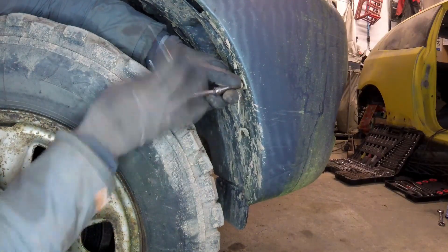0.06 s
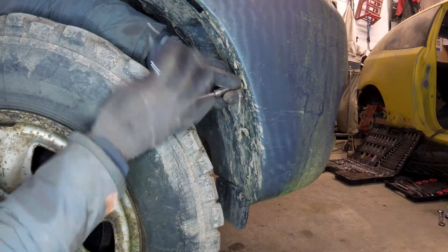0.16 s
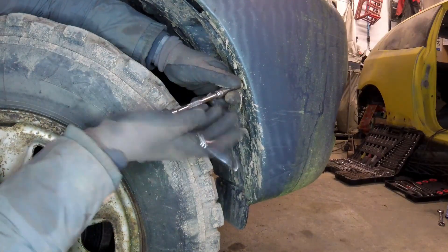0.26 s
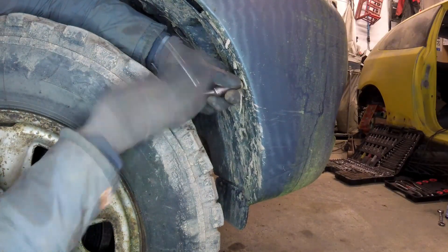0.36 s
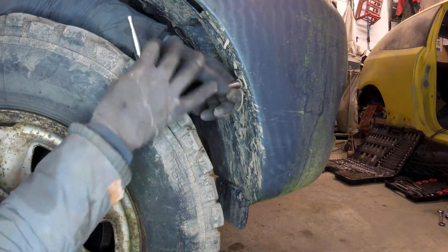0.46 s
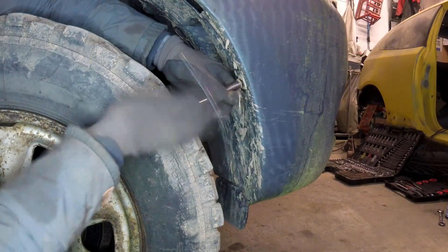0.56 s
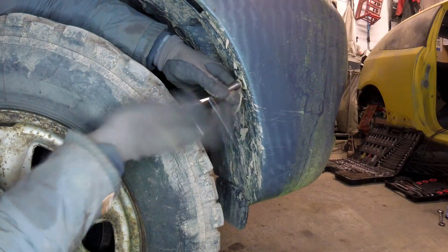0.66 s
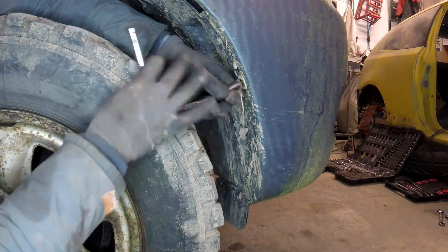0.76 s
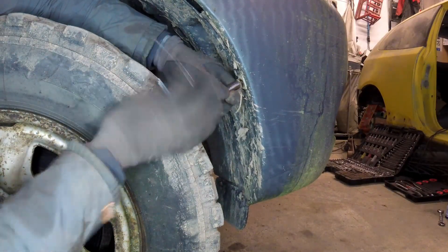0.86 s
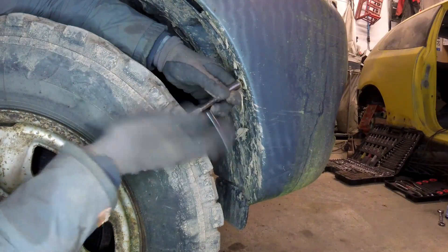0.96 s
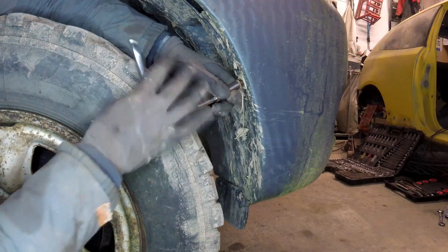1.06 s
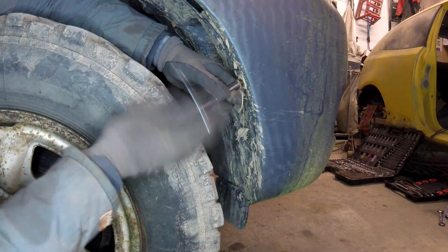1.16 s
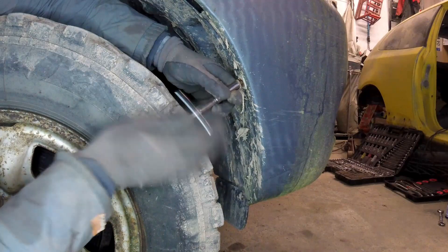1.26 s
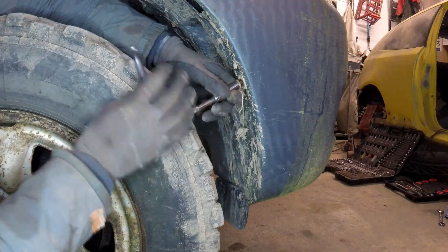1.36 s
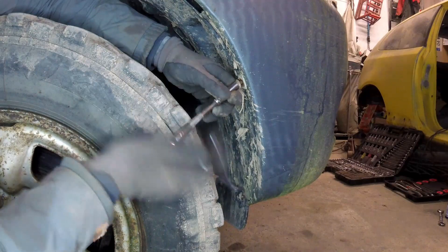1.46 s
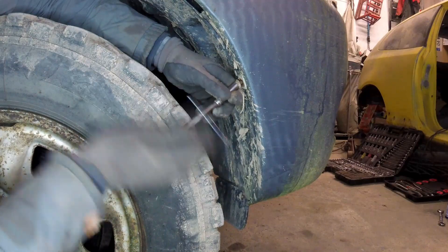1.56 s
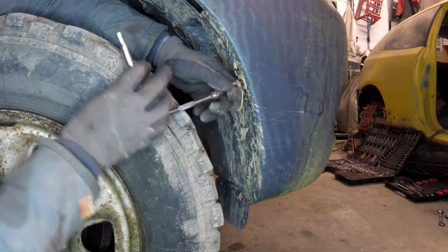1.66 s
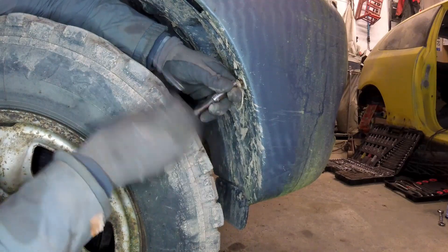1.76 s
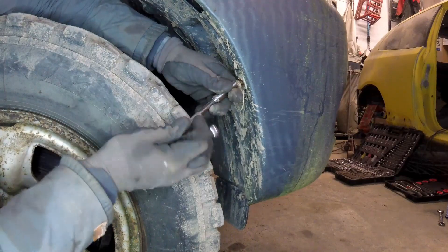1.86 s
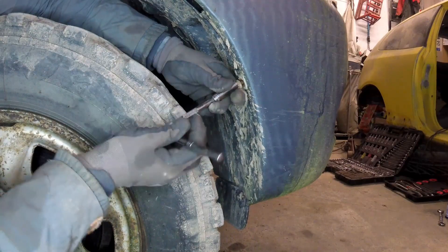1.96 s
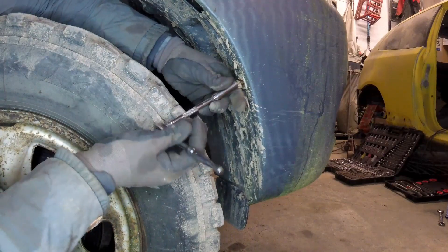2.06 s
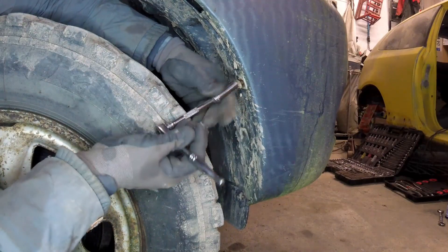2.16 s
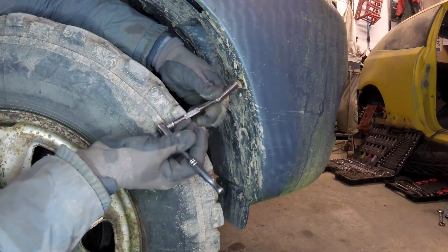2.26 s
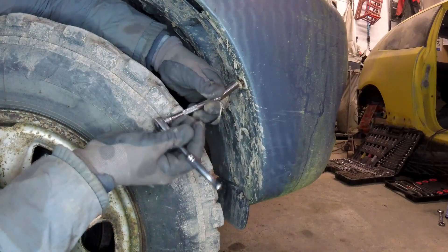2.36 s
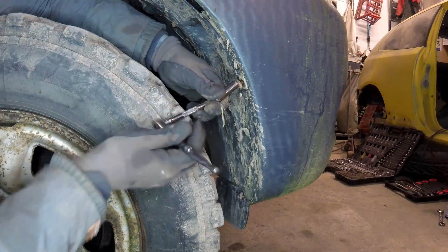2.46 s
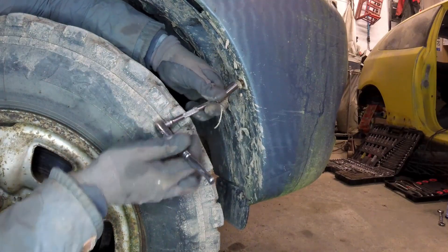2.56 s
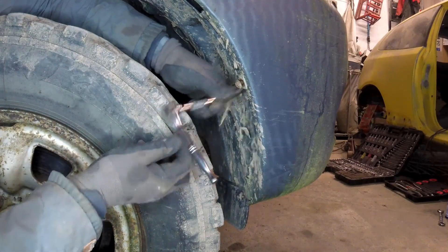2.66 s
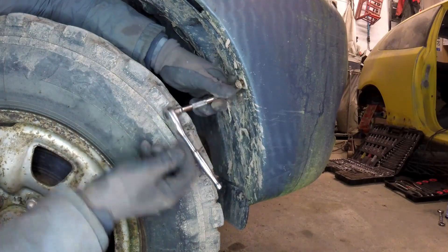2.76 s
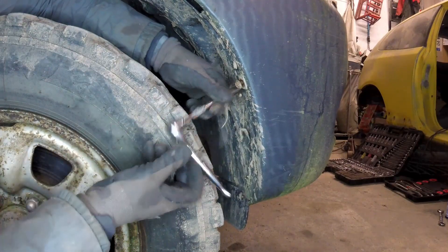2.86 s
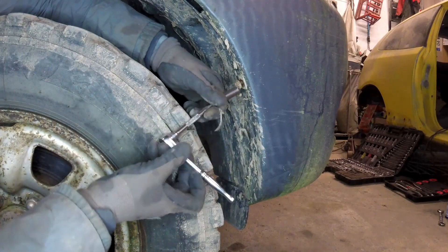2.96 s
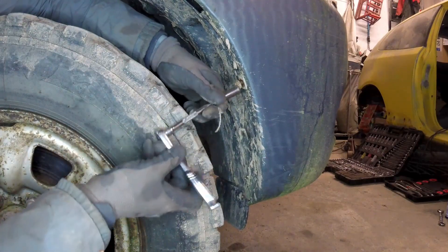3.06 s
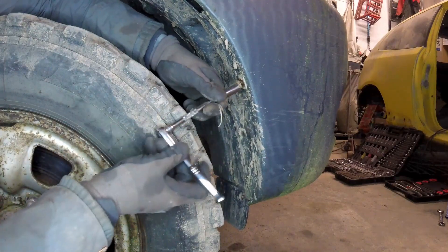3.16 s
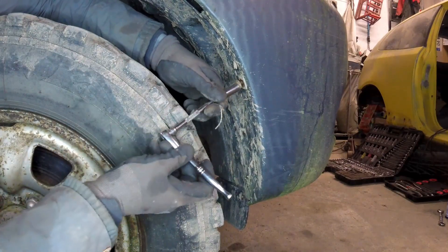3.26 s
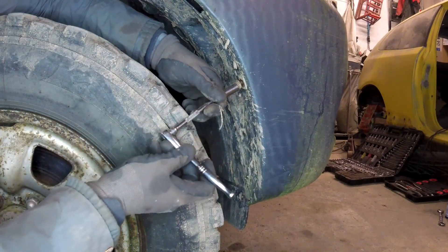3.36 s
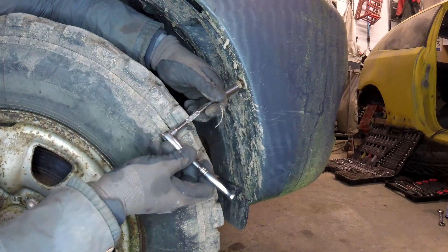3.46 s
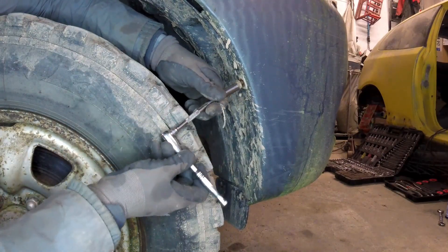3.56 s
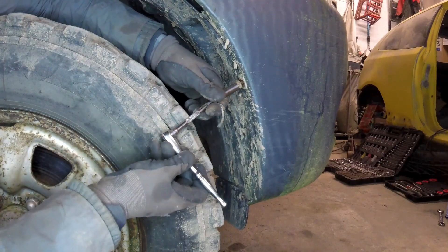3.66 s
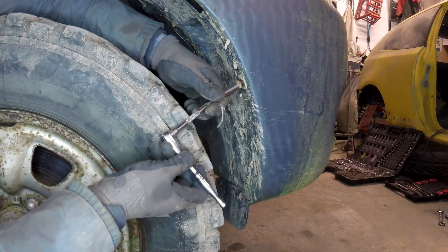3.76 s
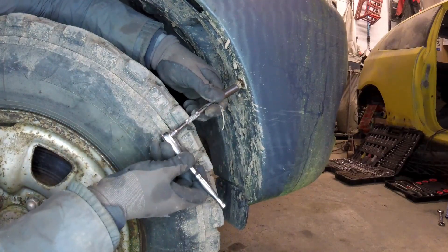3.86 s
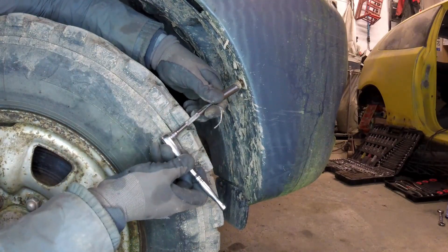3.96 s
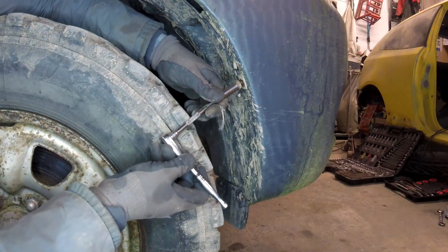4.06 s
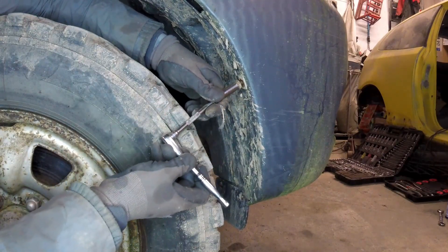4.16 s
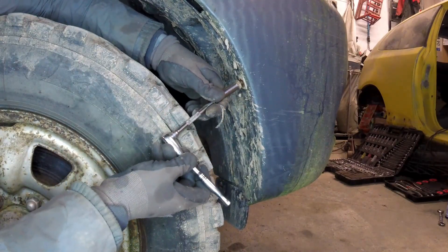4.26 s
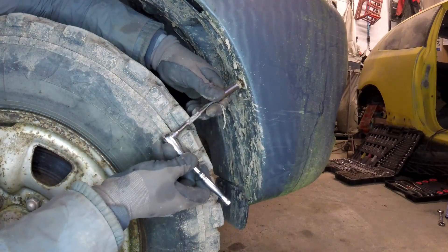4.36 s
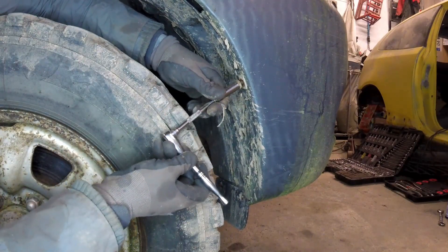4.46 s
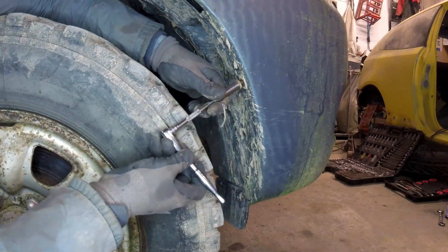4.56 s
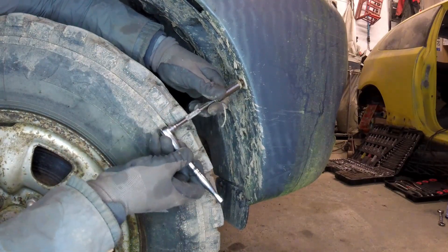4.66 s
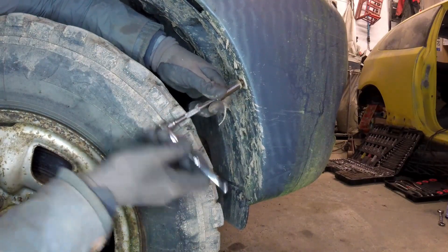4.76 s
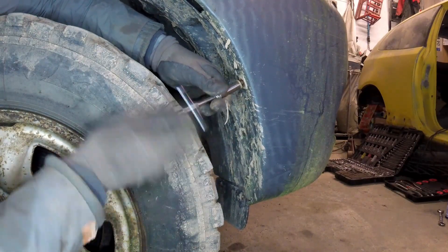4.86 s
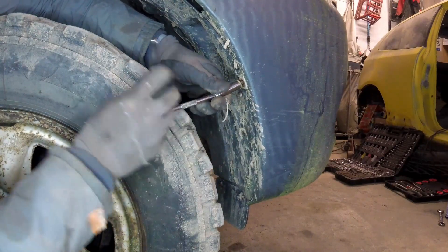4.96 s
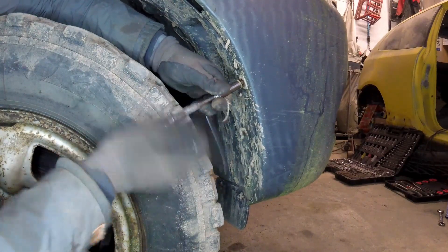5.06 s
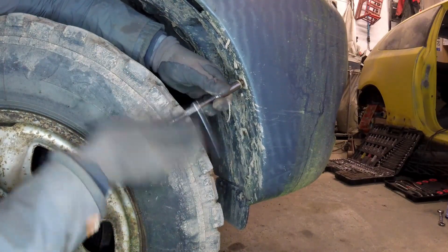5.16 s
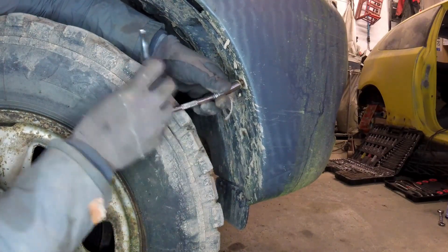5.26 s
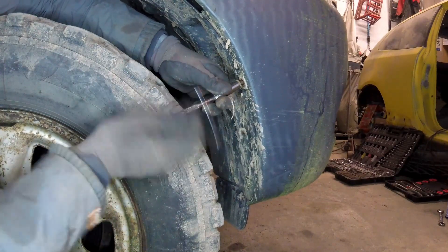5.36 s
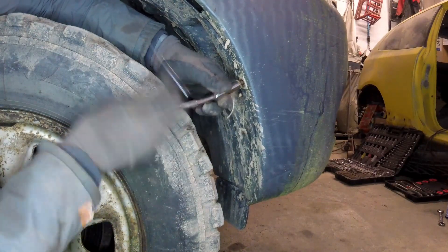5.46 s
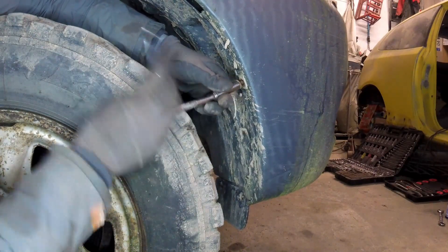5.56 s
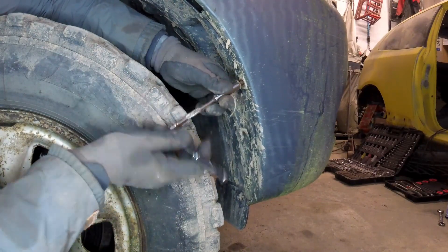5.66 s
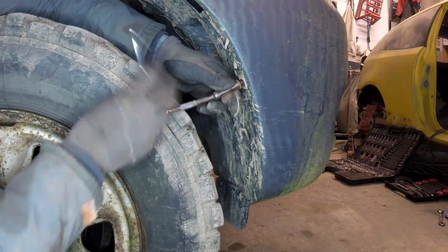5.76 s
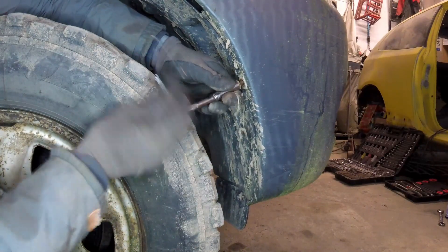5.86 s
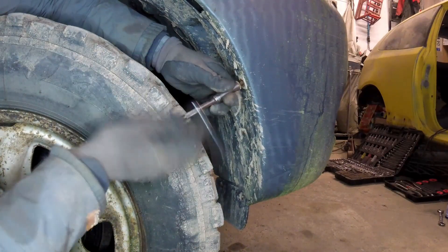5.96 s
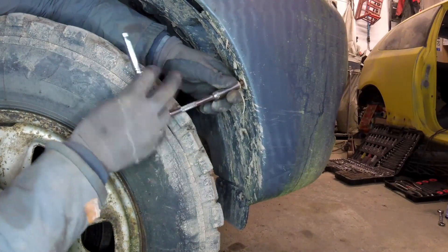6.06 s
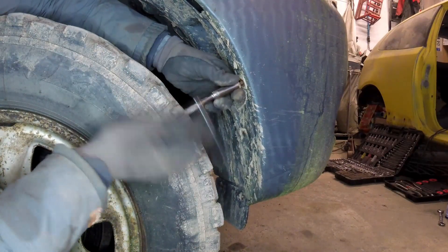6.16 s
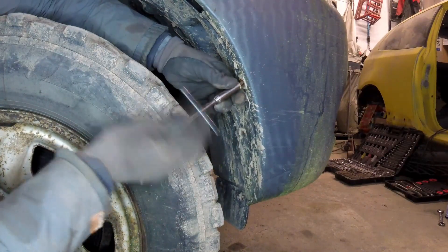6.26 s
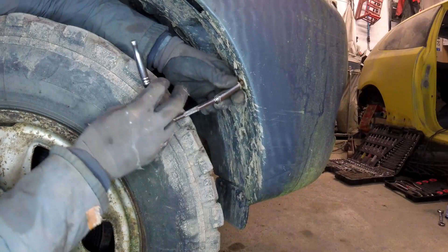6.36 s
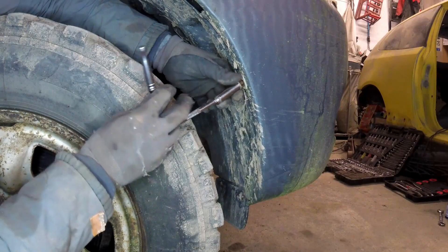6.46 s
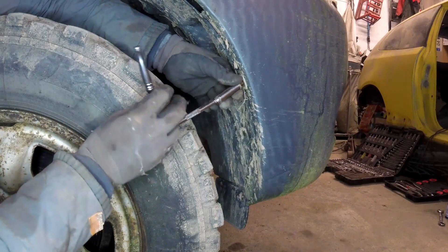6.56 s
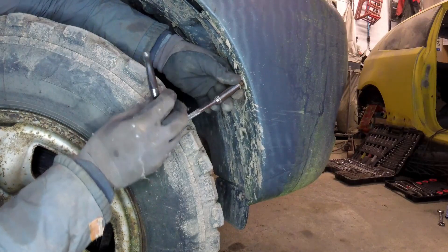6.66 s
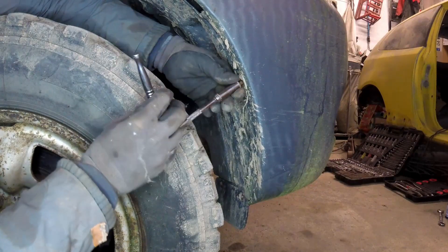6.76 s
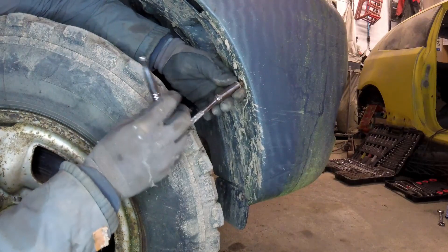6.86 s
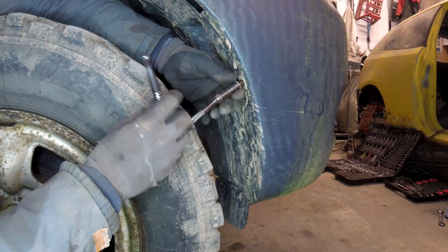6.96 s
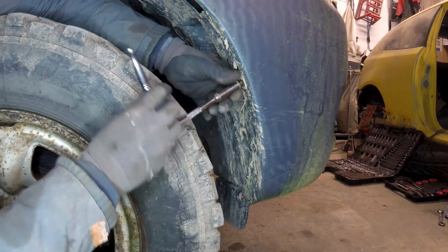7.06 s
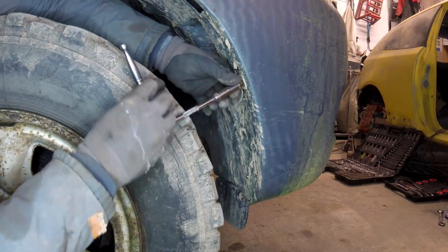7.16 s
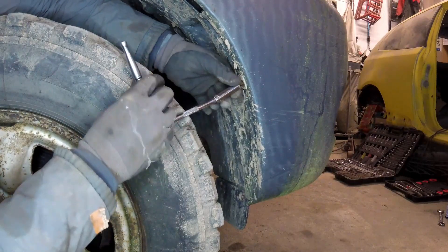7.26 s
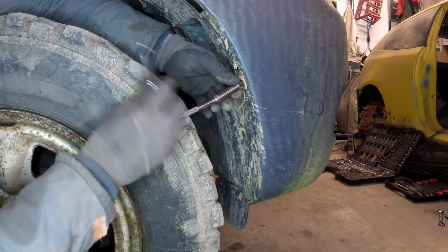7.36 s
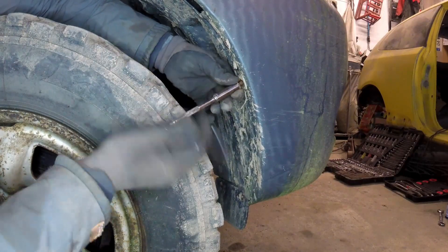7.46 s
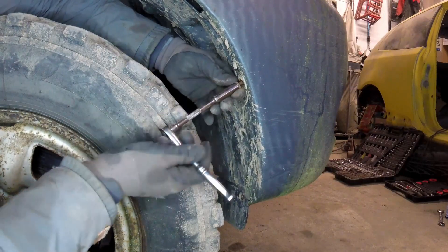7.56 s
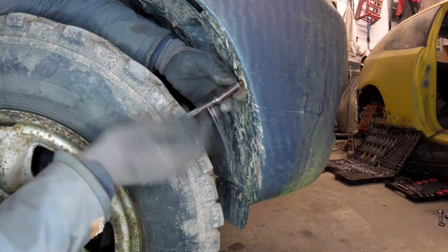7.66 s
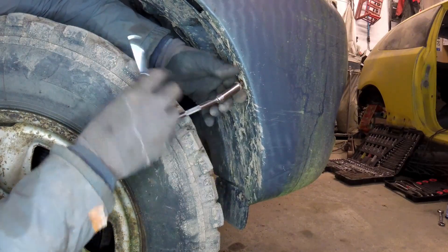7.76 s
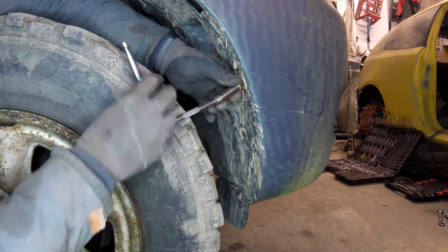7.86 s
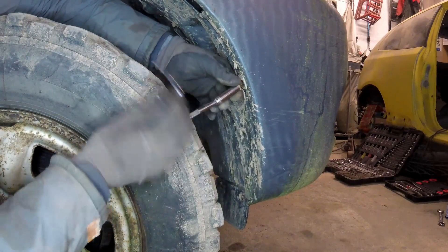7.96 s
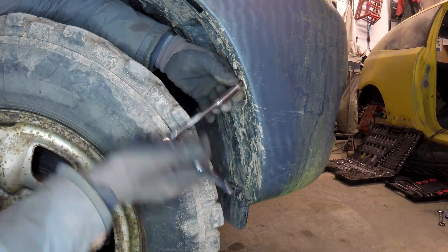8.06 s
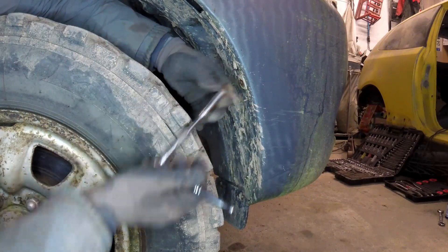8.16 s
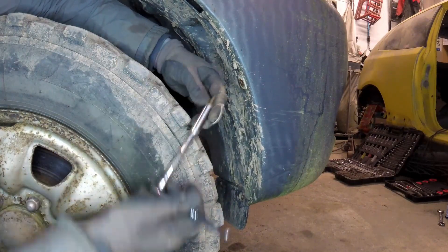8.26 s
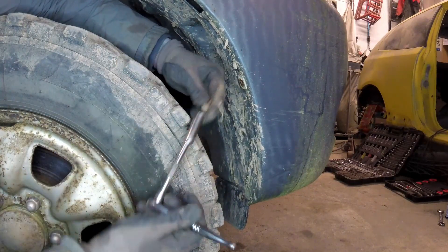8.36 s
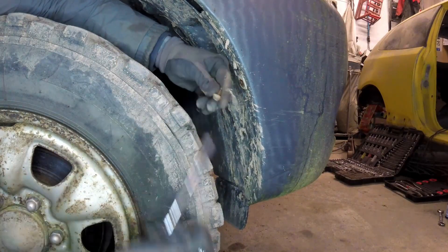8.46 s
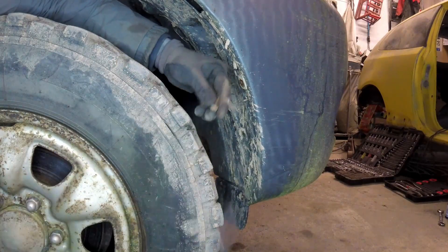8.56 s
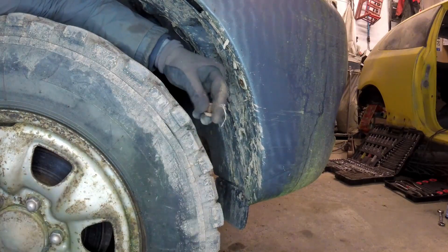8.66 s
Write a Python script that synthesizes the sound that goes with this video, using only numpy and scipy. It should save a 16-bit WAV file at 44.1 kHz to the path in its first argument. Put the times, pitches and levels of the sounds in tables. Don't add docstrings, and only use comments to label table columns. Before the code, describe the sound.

A close, dry phone pickup in a workshop: a small steel ratchet works a bolt in a hollow plastic wheel-arch panel. From 0.2 to 1.75 seconds six fast back-swings, each under a tenth of a second, blur bright clicks into a short zipping whirr, with soft hollow thumps between. Slower single clicks follow until about 2. At 2.6 comes a loud cluster of knocks with a creak and gritty scrape, then a few loose clicks near 2.8. From 3 to 4.8 it is mostly quiet, with isolated taps at 3.5, 4.4 and 4.7. Rapid zips resume at 5.0, loudest around 5.9, ending near 6.2; a halting, slower run comes at 6.6. Longer ratchet swings run at 7.3-7.55 and 7.9-8.1. Faint glove rustle, then a sharp double steel clank at 8.7. A faint low machine hum and air continue throughout.

```python
import sys
import numpy as np
from scipy import signal
from scipy.fft import rfft, irfft
from scipy.io import wavfile
from scipy.ndimage import uniform_filter1d

SR = 44100
rng = np.random.default_rng(int(sys.argv[2]) if len(sys.argv) > 2 else 0)


def voltage_ratio(level):
    return 10 ** (np.asarray(level, float) / 20)


def store_wav(level_fs):
    pcm = np.round(np.clip(np.atleast_2d(level_fs), -1, 1) * 32767)
    wavfile.write(sys.argv[1], SR, pcm.T.astype(np.int16))


N = 384993

# freq_hz, level_db, t60_s
HEAD_MODES = [(4990, -4.5, 0.0062), (5473, -8, 0.007), (6000, -6, 0.008), (6770, -7.5, 0.012),
              (7604, -5, 0.007), (8610, -11, .009), (9340, -13, 0.012), (10630, -8.5, 0.0074),
              (12320, -17.5, 0.007), (13600, -19, 0.007), (14700, -18, .006)]
# freq_hz, level_db, t60_s
BOLT_MODES = [(382, -4.5, 0.11), (491.6, 2, 0.031), (676, -1, 0.028), (1009, -6, 0.032), (1293, -1, 0.01),
              (1628, 0, 0.01), (2290, -5, 0.017), (2763, -4, 0.0083), (3180, -15.5, 0.036)]
# start_s, peak_db
FIRST_CRANKING = [(0.1805, -25), (0.185, -27), (0.1894, -28), (0.1933, -28), (0.2026, -29), (0.2051, -29),
                  (0.2094, -31), (0.2114, -28), (0.2158, -25), (0.2202, -28), (0.225, -26), (0.2278, -23),
                  (0.2309, -25), (0.2391, -27), (0.2449, -31), (0.4976, -29), (0.502, -28), (0.5074, -30),
                  (0.5166, -29), (0.5205, -33), (0.5237, -30), (0.5271, -33), (0.5304, -31), (0.5345, -30),
                  (0.5372, -29), (0.5413, -28), (0.5471, -29), (0.5498, -29), (0.5556, -28), (0.5572, -31),
                  (0.5613, -31), (0.5638, -30), (0.5674, -29), (0.574, -28), (0.5772, -26), (0.5815, -32),
                  (0.5885, -28),
                  (0.8157, -30), (0.8212, -30), (0.8265, -26), (0.8297, -29), (0.8335, -28), (0.8387, -26),
           (0.8414, -26), (0.8461, -30), (0.8482, -29), (0.8509, -26), (0.8536, -29), (0.8595, -26),
           (0.8617, -27), (0.8653, -29), (0.8705, -25), (0.8753, -27), (0.8787, -26), (0.8815, -27),
           (0.8852, -27), (0.8886, -32), (0.8944, -27), (0.8989, -28), (1.1052, -34), (1.1123, -30),
           (1.1184, -30), (1.1239, -31), (1.1284, -29), (1.1332, -30), (1.1361, -30), (1.1415, -25),
           (1.1452, -29), (1.1482, -26), (1.154, -29), (1.1605, -28), (1.1651, -31), (1.1685, -24),
           (1.1738, -27), (1.1769, -30), (1.1849, -35),
                  (1.3917, -29), (1.3973, -29), (1.402, -29), (1.4057, -30), (1.4099, -28), (1.4132, -30),
           (1.4168, -28), (1.4193, -29), (1.4225, -31), (1.4251, -29), (1.428, -29), (1.4308, -23),
           (1.4343, -29), (1.4409, -28), (1.4474, -24), (1.7131, -28), (1.7184, -27), (1.7234, -26),
           (1.7282, -29), (1.7329, -24), (1.7376, -33), (1.741, -30), (1.7463, -22), (1.7515, -28),
           (1.7567, -32), (1.7589, -31), (1.7653, -29)]
# start_s, peak_db
SECOND_CRANKING = [(4.9995, -38), (5.0079, -35), (5.0122, -27), (5.0187, -32), (5.0223, -30), (5.0277, -29),
                   (5.0305, -32), (5.0354, -27), (5.0385, -28), (5.0431, -27), (5.0464, -23), (5.051, -23),
                   (5.0544, -27), (5.0584, -25), (5.0624, -27), (5.0667, -25), (5.0717, -30), (5.0775, -29),
                   (5.0888, -28), (5.3195, -30), (5.3232, -26), (5.3282, -26), (5.3316, -25), (5.3354, -26),
                   (5.3379, -29), (5.3427, -28), (5.3456, -27), (5.35, -22), (5.3529, -25), (5.3575, -20),
                   (5.3609, -23), (5.3653, -23), (5.3693, -23), (5.3751, -24), (6.5931, -40), (6.5971, -31),
                   (6.6029, -29), (6.6132, -29), (6.6188, -26), (6.6298, -27), (6.6334, -27), (6.6443, -28),
                   (6.6475, -30), (6.6583, -29), (6.6622, -30), (6.6759, -29), (6.6805, -31),
                   (5.575, -29), (5.5808, -28), (5.5848, -26), (5.5904, -27), (5.5933, -24), (5.5977, -26),
           (5.6001, -25), (5.6041, -31), (5.6069, -26), (5.6105, -22), (5.6129, -23), (5.6161, -22),
           (5.6215, -23), (5.627, -19), (5.631, -27), (5.6404, -26), (5.6442, -25), (5.8426, -29),
           (5.8477, -29), (5.8518, -28), (5.8565, -25), (5.8599, -29), (5.8638, -29), (5.8665, -26),
           (5.8701, -22), (5.8731, -21), (5.8761, -21), (5.8789, -20), (5.8843, -19), (5.8886, -17),
           (5.894, -21), (5.8971, -16), (5.9012, -22), (5.9083, -23), (5.9147, -24), (6.1338, -25),
           (6.1368, -26), (6.141, -20), (6.1479, -22), (6.1549, -21), (6.1579, -21), (6.1651, -23),
           (6.17, -25), (6.1746, -31)]
# start_s, peak_db
LONG_SWINGS = [(7.2919, -29), (7.2978, -31), (7.3051, -29), (7.3108, -31), (7.3159, -28), (7.3221, -32),
               (7.3259, -34), (7.3286, -35), (7.3321, -31), (7.3347, -32), (7.3415, -27), (7.3439, -27),
               (7.3502, -29), (7.3527, -28), (7.3586, -28), (7.3609, -26), (7.3663, -27), (7.3689, -28),
               (7.3744, -24), (7.377, -27), (7.3826, -23), (7.386, -26), (7.3917, -25), (7.3949, -28),
               (7.3995, -24), (7.4069, -28), (7.4098, -28), (7.4139, -24), (7.4173, -26), (7.4214, -23),
               (7.4246, -26), (7.4291, -27), (7.4322, -25), (7.4389, -23), (7.4436, -26), (7.4464, -24),
               (7.4504, -24), (7.4529, -23), (7.4571, -25), (7.4596, -24), (7.4634, -25), (7.4659, -26),
               (7.4699, -25), (7.4734, -23), (7.4773, -25), (7.4805, -23), (7.4844, -22), (7.488, -25),
               (7.4923, -23), (7.4954, -23), (7.4976, -26), (7.5002, -23), (7.5026, -26), (7.5076, -25),
               (7.5102, -25), (7.5158, -22), (7.5202, -22), (7.5264, -27), (7.5316, -21),
               (7.8903, -29), (7.8971, -29), (7.9062, -29), (7.911, -33), (7.9167, -26), (7.92, -26),
                (7.9252, -23), (7.9286, -27), (7.9333, -28), (7.9369, -22), (7.9403, -29), (7.9437, -28),
                (7.9471, -24), (7.9498, -27), (7.9565, -24), (7.9595, -26), (7.9621, -27), (7.9654, -25),
                (7.9679, -24), (7.9709, -23), (7.9736, -24), (7.9787, -26), (7.9817, -26), (7.9841, -27),
                (7.989, -25), (7.9932, -22), (8.0021, -26), (8.0051, -26), (8.0074, -25), (8.0117, -24),
                (8.0139, -25), (8.0177, -25), (8.0216, -21), (8.0256, -20), (8.0282, -23), (8.0327, -30),
                (8.0374, -22), (8.0423, -24), (8.0482, -28), (8.0522, -24), (8.0621, -29), (8.0687, -26),
                (8.0765, -26)]
# start_s, peak_db
STRAGGLER_TEETH = [(0.2514, -27), (0.2783, -32), (0.5944, -30), (0.6913, -39), (0.9218, -36), (0.9246, -33),
                   (1.2151, -37), (1.4564, -22), (1.4644, -28), (1.474, -26), (1.503, -33), (1.5084, -33),
                   (1.6926, -29), (3.5648, -39), (4.7292, -39), (5.1172, -36), (5.4031, -33), (5.6594, -28),
                   (5.6704, -28), (5.9304, -35), (7.2809, -29), (7.5404, -27), (7.4026, -28), (7.4365, -25),
                   (5.8816, -23), (6.1435, -24), (7.5511, -23), (8.089, -23), (8.1004, -24), (8.1214, -28)]
# start_s, peak_db
SLOW_TURN_TEETH = [(1.7749, -27), (1.7874, -31), (1.7998, -29), (1.8148, -29), (1.8477, -27), (1.8751, -26),
                   (1.8854, -31), (1.9116, -32), (1.957, -32), (2.0293, -29), (2.809, -28), (2.8245, -33),
                   (2.8474, -34), (2.8684, -31), (2.8978, -31), (6.7261, -29), (6.7386, -29), (6.8394, -29),
                   (6.8698, -30)]
# start_s, peak_db
PAWL_TICKS = [(0.0273, -34), (0.0593, -34), (0.0807, -37), (0.0912, -36), (0.0974, -36), (0.1276, -34),
              (0.1324, -34), (3.0629, -44), (3.4955, -30), (3.5024, -37), (4.368, -39), (7.238, -45)]
# start_s, end_s, whirr_db, grind_db, grind_tilt_db_per_octave
BACK_SWINGS = [(0.189, .245, -26, -39, 0.8), (0.51, 0.588, -28, -39.5, 1), (0.824, 0.901, -24, -36.5, 2.5),
               (1.117, 1.185, -28, -40.5, -0.3), (1.395, 1.441, -27.5, -41.5, -2),
               (1.72, 1.754, -29.5, -53.5, 5), (5.007, 5.094, -35, -43.5, 1.5),
               (5.314, 5.364, -27.5, -39.5, 0), (5.577, 5.652, -28.5, -43.5, 1),
               (5.848, 5.914, -24, -42, 1), (6.134, 6.17, -26, -48, 3), (6.601, 6.693, -50, -59.5, 5),
               (7.3, 7.52, -34, -51, 2.5), (7.925, 8.005, -27, -48, 1)]
# start_s, peak_db
CLANK_HITS = [
    (8.7048, -12.5),
    (8.7075, -11),
    (8.7105, -22),
]
# freq_hz, level_db, t60_s
STEEL_MODES = [(2300, -20, 0.008), (3300, -20, 0.008), (5420, 2, 0.0059), (6130, -10, 0.06),
               (7230, -7.5, .014), (8430, -9, 0.012), (9530, -9.5, 0.013), (10900, -15.5, .01),
               (13300, -18, .01)]
# start_s, peak_db
PALM_THUMPS = [(0.025, -17.5), (0.252, -23), (0.363, -27), (0.506, -25.5), (0.599, -22), (0.626, -20.5),
               (0.692, -28), (0.724, -22), (0.928, -24.5), (1.002, -26), (1.203, -29), (1.354, -33),
               (1.456, -22.5), (1.548, -22), (2.728, -18), (2.78, -27), (5.084, -24.5), (5.128, -24),
               (5.225, -26.5), (5.305, -32.5), (5.398, -23), (5.623, -29.5), (5.681, -27), (5.946, -21),
               (6.095, -29), (6.382, -36), (7.294, -34.5), (7.805, -39)]
# start_s, peak_db
TOOL_KNOCKS = [(1.699, -20), (2.03, -26.5), (2.186, -24.5), (2.233, -28.5), (2.441, -33.5), (2.611, -14),
               (2.636, -14), (2.643, -12), (2.871, -22.5), (3.27, -27), (3.306, -27.5), (3.497, -16),
               (3.735, -36.5), (4.369, -25.5), (4.38, -22.5), (4.757, -28), (8.706, -27.5)]
# freq_hz, level_db, t60_s
PANEL_MODES = [(147, -22, 0.05), (165, 1.5, 0.2), (189, -4, 0.15), (205.7, -10.5, .12), (252.7, -7, 0.23),
               (330, -9, 0.1), (375, -10, 0.12), (475.3, -13, 0.11), (565, -17, 0.045),
               (668.3, -18.5, 0.068)]
# start_s, peak_db, t60_s, crack_over_rattle_db
HARD_TAPS = [(0.022, -35.5, .06, 7), (0.127, -32.5, .09, 7), (.358, -42, .035, 3), (0.691, -42, .06, 7),
             (1.509, -39, .06, 4), (1.696, -39, .18, 7), (2.031, -43, .068, 7), (2.559, -31, .1, 9),
             (2.594, -34, .2, -3), (2.626, -29, .12, 3), (2.641, -29, .18, -3), (2.65, -31, .12, 3),
             (2.868, -33, .075, 7), (2.903, -35.5, .066, 7), (3.169, -42.5, .065, 7), (3.269, -48, .05, 3),
             (3.288, -42, .05, 3), (3.303, -40, .06, 3), (3.349, -47, .07, 3), (3.497, -28.5, .1, 7),
             (4.367, -31, .12, 3), (4.729, -29.5, .18, 7), (4.999, -41, .1, 7), (5.179, -47, .03, 7),
             (8.705, -42, .055, 7)]
# freq_hz, gain_db
TAP_SPECTRUM = [(300, -2), (1000, 7), (2000, -1), (3500, -3.5), (5400, -3.5), (9000, -30.5), (15000, -46)]
# time_s, level_db
HAND_EFFORT = [(0, -42), (.8, -44), (1.3, -50), (1.9, -47), (2.3, -50), (3.1, -55), (3.7, -55), (4.2, -60),
               (4.62, -56), (4.85, -47), (5.5, -45), (6.07, -48), (6.5, -50), (7.24, -57), (7.76, -51),
               (8.14, -54), (8.6, -57)]
# peak_s, boom_db, creak_db, rise_s, fall_s (per 20 dB)
PANEL_PUSHES = [(.035, -27, -42, .05, .12), (.38, -31.5, -46, .4, .12), (.64, -32, -40, .2, .4),
                (.85, -44, -41, .15, .4), (1.01, -34.5, -45, .3, .15), (1.23, -33, -43, .4, .1),
                (1.45, -32, -40, .14, .4), (1.55, -35, -32, .2, .11), (1.71, -29, -40, .045, .13),
                (2.045, -31, -48, .025, .08), (2.19, -40, -46, .05, .25), (2.645, -23, -18, .1, .12),
                (2.88, -23.5, -32.5, .05, .14), (3.33, -33, -35, .06, .12), (3.51, -26, -35, .014, .1),
                (4.38, -31, -29, .035, .1), (4.76, -33.5, -54, .07, .15), (8.73, -31, -37.5, .04, .1),
                (5.42, -36, -40, .3, .12), (5.67, -36, -43, .35, .3), (5.96, -34, -41, .3, .15),
                (6.11, -37.5, -51, .07, .5), (7.47, -42, -48.5, .3, .5), (8.06, -39.5, -48, .45, .12)]
# peak_s, scrape_db, rustle_db, rise_s, fall_s (per 20 dB)
GLOVE_SLIPS = [
    (0, -56.5, -61, .1, 1.5),
    (1.52, -54.5, -58, .3, .25),
    (2.44, -60.5, -58, .12, .12),
    (2.64, -41.5, -50, .12, .12),
    (2.9, -58, -64, .3, .2),
    (3.31, -57, -69, .15, .2),
    (8.22, -63, -60, .15, .5),
    (8.73, -61, -58, .6, .1),
]
# freq_hz, gain_db
SCRAPE_SPECTRUM = [(600, -1), (900, 2.5), (1800, -3), (3200, -6.5), (5000, -20)]
# freq_hz, gain_db
RUSTLE_SPECTRUM = [(3000, -26), (4500, 15), (9000, 10), (15000, -21.5)]
# freq_hz, gain_db
SHOP_SPECTRUM = [(100, 7.5), (250, 3.5), (600, -8), (1500, -12), (3000, -20.5), (6000, -19.5),
                 (10000, -15.5), (16000, -19)]
# freq_hz, gain_db
MIC_RESPONSE = [(2500, 3.5), (3400, 0), (4000, -5.5), (4600, -6.5), (5400, 1.5), (6500, -5), (10000, -3),
                (11500, -10), (13500, -11.5), (14800, -20), (15500, -24), (16000, -40)]
# freq_hz, gain_db
RUMBLE_SPECTRUM = [(30, -1), (60, 5), (120, 5), (300, -37)]

BOUNCE_S = .003
TREBLE_DB, TREBLE_DB_PER_DB, TREBLE_PIVOT_DB = -4, -.4, -26
PALM_UPPER_DB, TOOL_UPPER_DB, GRIP_T60_S = -4.5, 4, .1
DULL_HZ, HARD_TAP_DB = 3300, -32
CREAK_DB, SCRAPE_DB, RUSTLE_DB = -8, -18, -20.5
ARCH_T60_S, ARCH_DB, ROOM_T60_S, ROOM_DB = .023, -9, .55, -19.5
SHOP_DB, HUM_DB, RUMBLE_DB, LOW_CUT_HZ = -56.5, -60, -75.5, 133


def ratchet():
    s, db = teeth()
    count = len(s)
    low = strikes(HEAD_MODES[:5], count, size=500, scatter_db=3., detune=.04, rise_s=.0003)
    high = strikes(HEAD_MODES[5:], count, size=500, scatter_db=3., detune=.04, rise_s=.0003)
    treble_db = TREBLE_DB + TREBLE_DB_PER_DB * np.clip(db - TREBLE_PIVOT_DB, -7, 9)
    snap = low + voltage_ratio(treble_db)[:, None] * high
    knock = voltage_ratio(-21.5) * strikes(BOLT_MODES[3:], count, size=500, scatter_db=3.0, detune=0.087, rise_s=0.00024)
    chance = rng.standard_normal((count, 2))
    bounce = strikes(HEAD_MODES, count, size=300, scatter_db=2.0, detune=0.043, rise_s=.0005)
    bounce_s = s + BOUNCE_S * (1 + .2 * chance[:, 0])
    bounce_db = db - 15.5 + 0.89 * chance[:, 1]
    out = place(s + .0001, voltage_ratio(db + 1.1)[:, None] * (snap + knock))
    out = out + place(bounce_s, voltage_ratio(bounce_db)[:, None] * bounce)
    s, db = np.transpose(PAWL_TICKS)
    tick = strikes(HEAD_MODES[:5], len(s), size=500, scatter_db=3.5, detune=.04, rise_s=.0004)
    return out + place(s + .0003, voltage_ratio(db + 1.5)[:, None] * tick)


def teeth():
    cranks = FIRST_CRANKING + SECOND_CRANKING
    return np.transpose(cranks + LONG_SWINGS + STRAGGLER_TEETH + SLOW_TURN_TEETH)


def whirr():
    t, out, drag, tilt = np.arange(N) / SR, 0, 0, 0
    for start, end, whirr_db, grind_db, tilt_db in BACK_SWINGS:
        chance = rng.standard_normal((110, 2))
        s = start + np.cumsum(0.0019 * np.exp(0.25 * chance[:, 0]))
        arch_db = -14. * ((s - start) / (end - start) - .6) ** 2 - 8.5
        gain = voltage_ratio(whirr_db + arch_db + 3. * chance[:, 1])
        ring = strikes(HEAD_MODES, 110, size=300, scatter_db=5., detune=0.0486, rise_s=0.00055)
        out = out + place(s[s < end], (gain[:, None] * ring)[s < end])
        corners_s = [start - .013, start - .009, end - .01, end + 0.02]
        drag = drag + voltage_ratio(grind_db) * np.interp(t, corners_s, [0, .85, 1, 0])
        tilt = tilt + tilt_db * (np.abs(t - (start + end) / 2) < end - start)
    s, db = teeth()
    jolt = place(s, voltage_ratio(db / 2)[:, None] * np.exp(-np.arange(400) / SR / .0015))
    grit = rng.standard_normal(N) * (jolt + .03)
    grind = 0
    for hz, db, t60 in BOLT_MODES:
        turn = voltage_ratio(2.2 * walk(16) + tilt * np.log2(hz / 1000))
        grind = grind + turn * level(resonate(grit, hz, t60), db - 18.)
    return out + drag * grind


def clank():
    s, db = np.transpose(CLANK_HITS)
    ring = strikes(STEEL_MODES, len(s), size=2000, scatter_db=2.5, detune=0.008, rise_s=0.00014)
    return place(s, voltage_ratio(db)[:, None] * ring)


def thumps():
    out, t = 0, np.arange(5000) / SR
    grip = .8 + np.exp(-np.log(1000) * t / GRIP_T60_S)
    for table, upper_db in ((PALM_THUMPS, PALM_UPPER_DB), (TOOL_KNOCKS, TOOL_UPPER_DB)):
        s, db = np.transpose(table)
        held = [(hz, gain_db + upper_db * (hz > 300), 0.9 * t60) for hz, gain_db, t60 in PANEL_MODES]
        ring = grip * strikes(held, len(s), size=5000, scatter_db=3.5, detune=0.034, rise_s=.002)
        out = out + place(s + .0005, voltage_ratio(db - 5.5)[:, None] * ring)
    return out


def taps():
    s, db, t60, crack_db = np.transpose(HARD_TAPS)
    t = np.arange(6000) / SR
    rattle = np.exp(-np.log(1000) * t / np.clip(t60, .005, .3)[:, None])
    fall = rattle * (1 + voltage_ratio(crack_db)[:, None] * np.exp(-t / 0.0019))
    noise = rng.standard_normal((len(s), 6000))
    crack = colour(noise * fall * np.minimum(t / .0006, 1), TAP_SPECTRUM)
    dull = signal.sosfilt(signal.butter(4, DULL_HZ, fs=SR, output="sos"), crack)
    crack = dull + voltage_ratio(np.minimum(db - HARD_TAP_DB, 0))[:, None] * (crack - dull)
    return place(s, voltage_ratio(db + 4.0)[:, None] * crack / np.abs(crack).max(axis=1, keepdims=True))


def shake():
    boom, creak = swells(PANEL_PUSHES, [0, CREAK_DB])
    out, unrest_db = 0, 4.5 * walk(30)
    for hz, db, t60 in PANEL_MODES:
        push = voltage_ratio(unrest_db) * rng.standard_normal(N)
        ring = level(resonate(push, hz, 0.51 * t60), db)
        out = out + ring * (boom * voltage_ratio(-8.5) if hz < 300 else creak * voltage_ratio(-1.5))
    return out


def slide():
    scrape, rustle = swells(GLOVE_SLIPS, [SCRAPE_DB, RUSTLE_DB])
    grit = rng.standard_normal(N) * voltage_ratio(2.0 * walk(300) + 2.2 * walk(40))
    cloth = rng.standard_normal(N) * voltage_ratio(1.9 * walk(60) + 2.2 * walk(9))
    scraping = level(colour(grit, SCRAPE_SPECTRUM), 0) * scrape * voltage_ratio(3.0)
    return scraping + level(colour(cloth, RUSTLE_SPECTRUM), 0) * rustle * voltage_ratio(5.5)


def shop():
    air = level(colour(rng.standard_normal(N), SHOP_SPECTRUM), SHOP_DB) * voltage_ratio(.8 * walk(3))
    hum_hz = 134 + 1.5 * walk(8)
    hum = np.sin(2 * np.pi * np.cumsum(hum_hz) / SR) * voltage_ratio(1.5 * walk(6))
    return air + level(hum, HUM_DB)


def strikes(modes, count, size, scatter_db, detune, rise_s):
    t, out = np.arange(size) / SR, 0
    chance = rng.standard_normal((count, len(modes), 3))
    for k, (hz, db, t60) in enumerate(modes):
        phase = 2 * np.pi * hz * (1 + detune * chance[:, k, 1:2]) * t + chance[:, k, 2:]
        decay = np.exp(-np.log(1000) * t / t60)
        out = out + voltage_ratio(db + scatter_db * chance[:, k, :1]) * np.sin(phase) * decay
    out = out * (1 - np.exp(-t / rise_s))
    return out / np.abs(out).max(axis=1, keepdims=True)


def resonate(drive, hz, t60):
    pole = np.exp(2j * np.pi * hz / SR - np.log(1000) / (t60 * SR))
    return signal.lfilter([1], [1, -pole], drive).imag


def place(times, shapes):
    out = np.zeros(N + shapes.shape[1])
    for s, shape in zip(times, shapes):
        i = min(max(int(s * SR), 0), N)
        out[i:i + len(shape)] += shape
    return out[:N]


def swells(table, rest_db):
    t = np.arange(0, N / SR + .002, .002)
    power = voltage_ratio(np.interp(t, *np.transpose(HAND_EFFORT)) + np.array(rest_db)[:, None]) ** 2
    for s, a_db, b_db, rise_s, fall_s in table:
        drop_db = 20 * np.maximum((s - t) / rise_s, (t - s) / fall_s)
        power = power + voltage_ratio(np.array([[a_db], [b_db]]) - drop_db) ** 2
    return (np.interp(np.arange(N) / SR, t, np.sqrt(p)) for p in power)


def walk(rate_hz):
    k = int(SR / rate_hz)
    return uniform_filter1d(np.repeat(rng.standard_normal(N // k + 1), k), k)[:N]


def level(x, db):
    return x * voltage_ratio(db) / np.sqrt(np.mean(x ** 2))


def colour(x, points):
    hz, db = np.transpose(points)
    grid_hz = np.maximum(np.fft.rfftfreq(2048, 1 / SR), 1)
    cepstrum = irfft(np.log(voltage_ratio(np.interp(np.log(grid_hz), np.log(hz), db))))
    cepstrum[1:1024] *= 2
    cepstrum[1025:] = 0
    kernel = irfft(np.exp(rfft(cepstrum)))
    if x.ndim > 1:
        kernel = kernel[None]
    return signal.fftconvolve(x, kernel, axes=-1)[..., :x.shape[-1]]


def tail(t60_s, db, gap_s):
    t = np.arange(int(t60_s * SR)) / SR
    h = rng.standard_normal(len(t)) * np.exp(-np.log(1000) * t / t60_s) * (t > gap_s)
    return h * voltage_ratio(db) / np.sqrt(np.sum(h ** 2))


def scene():
    clicks = ratchet() + clank()
    clicks = clicks + signal.fftconvolve(clicks, tail(ARCH_T60_S, ARCH_DB, .0008))[:N]
    near = clicks + whirr() + thumps() + taps() + shake() + slide()
    room = signal.fftconvolve(near, tail(ROOM_T60_S, ROOM_DB, .004))[:N]
    return (near + room + shop())[None]


def top_cut(x):
    return signal.sosfilt(signal.butter(12, 15750, fs=SR, output="sos"), x)


def record(dry):
    wind_cut = signal.ellip(5, .5, 21, LOW_CUT_HZ, "highpass", fs=SR, output="sos")
    rumble = level(colour(rng.standard_normal(N), RUMBLE_SPECTRUM), RUMBLE_DB)
    mix = signal.sosfiltfilt(wind_cut, colour(dry, MIC_RESPONSE)) + rumble
    return top_cut(mix)


dry = scene()
out = record(dry)
store_wav(out)
```